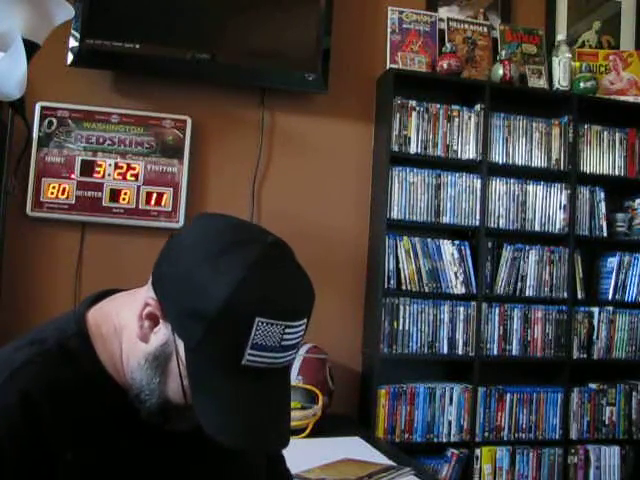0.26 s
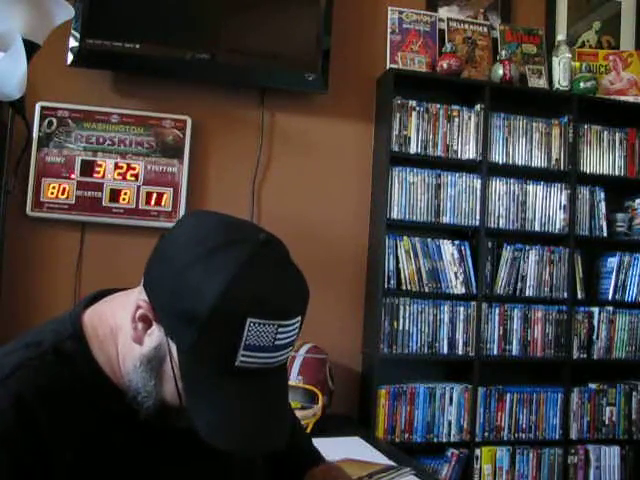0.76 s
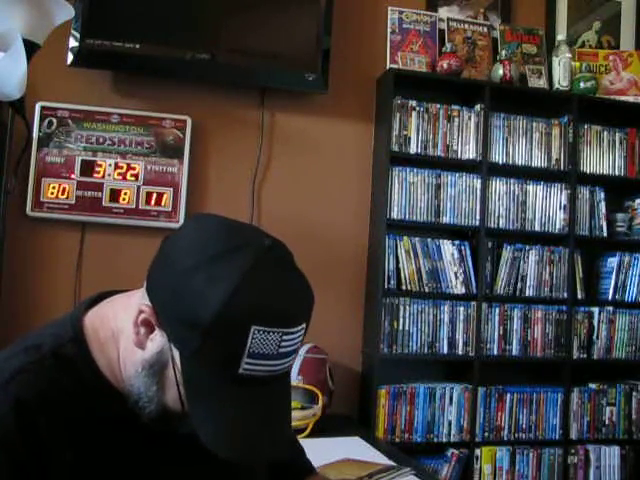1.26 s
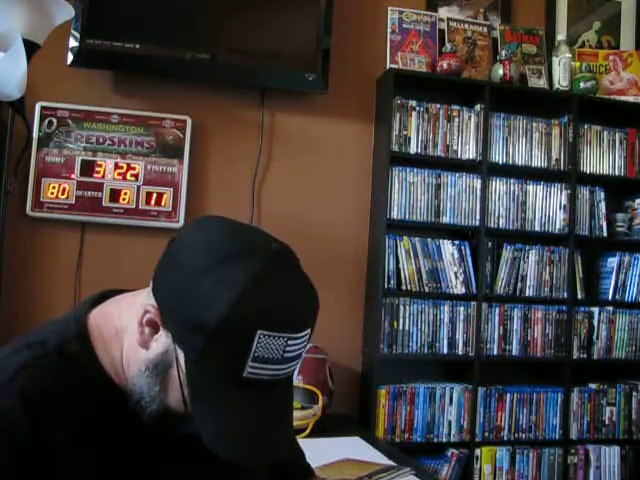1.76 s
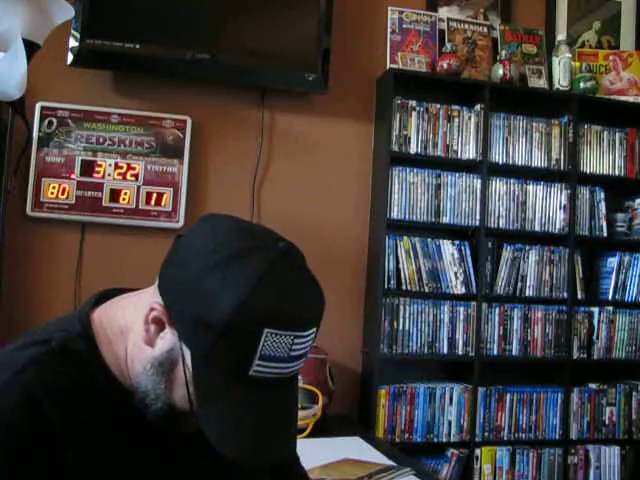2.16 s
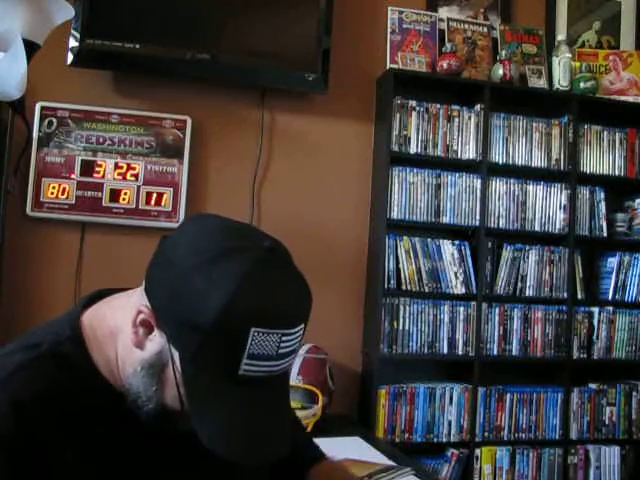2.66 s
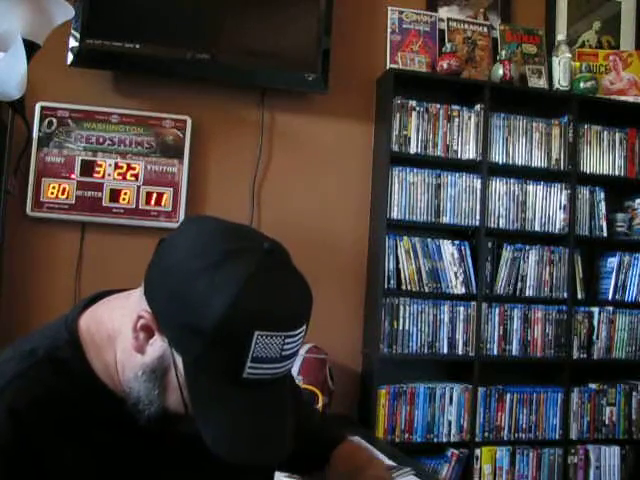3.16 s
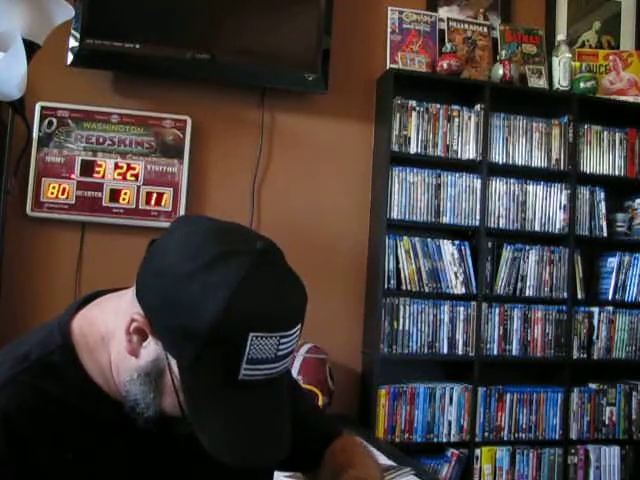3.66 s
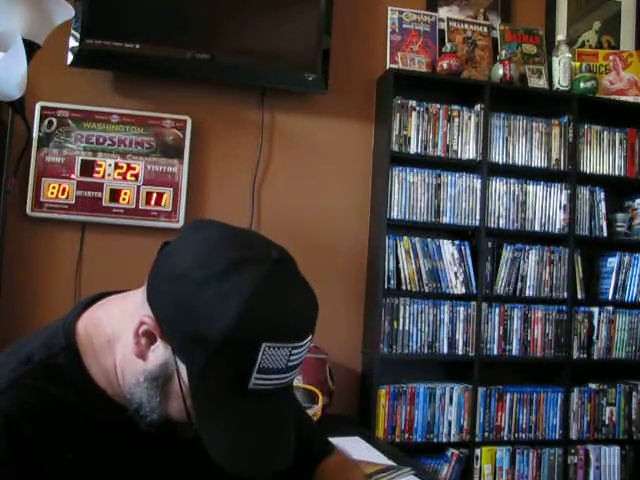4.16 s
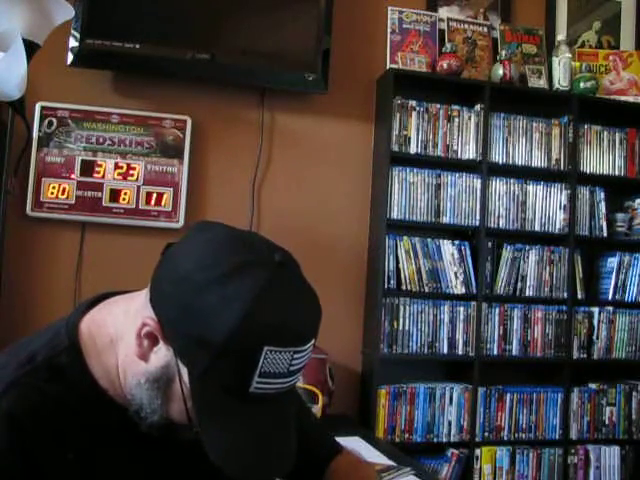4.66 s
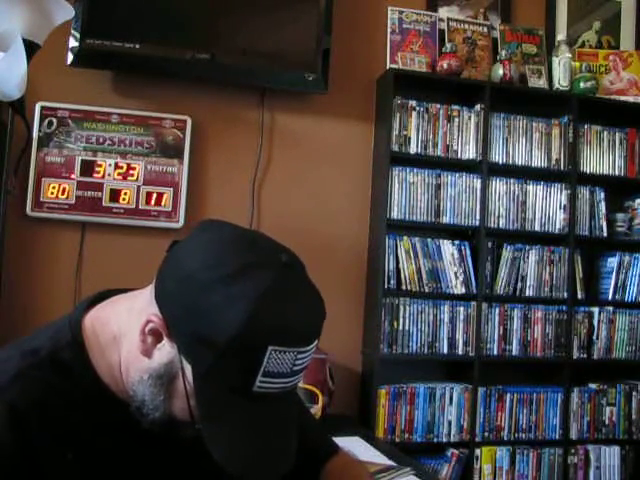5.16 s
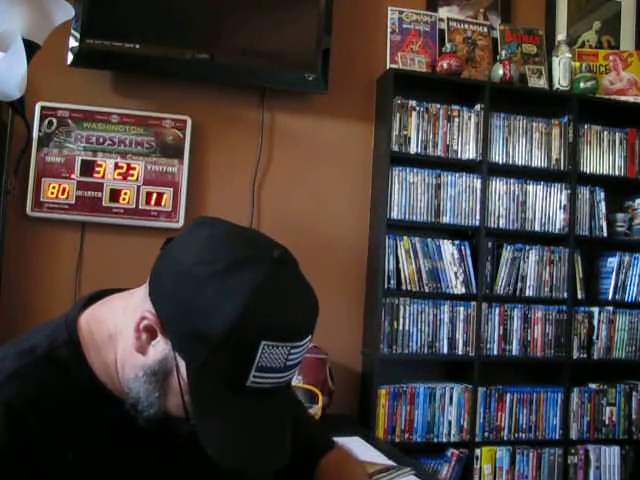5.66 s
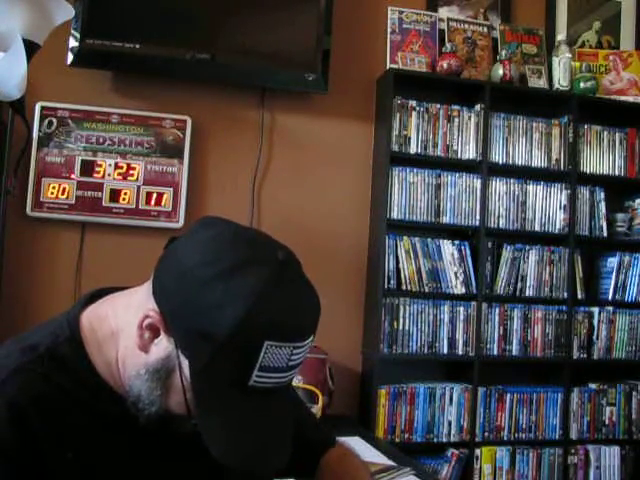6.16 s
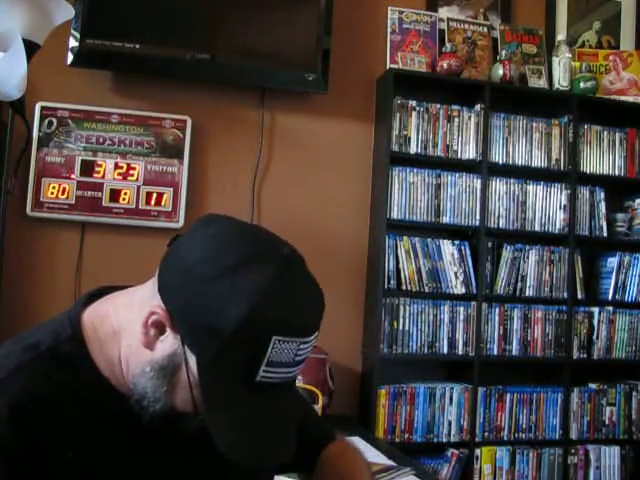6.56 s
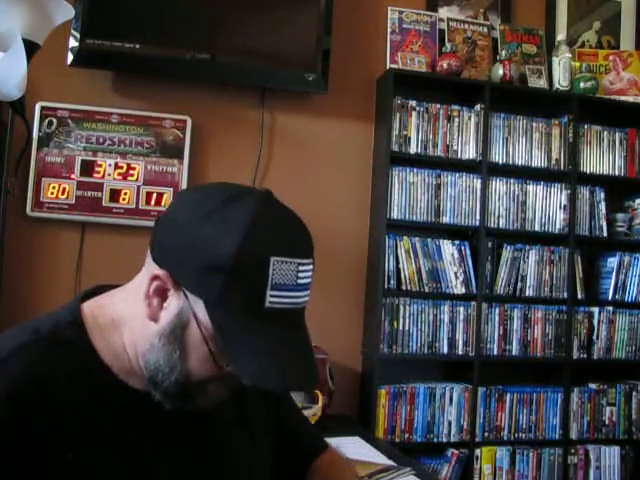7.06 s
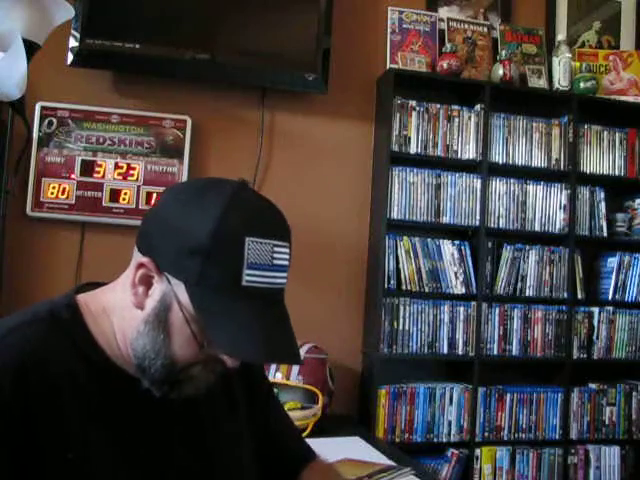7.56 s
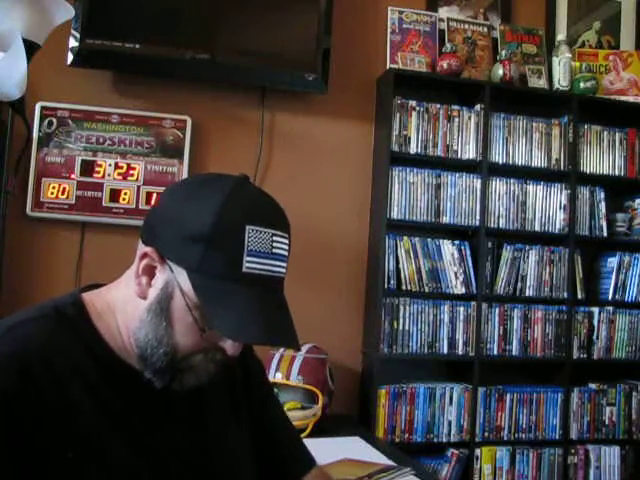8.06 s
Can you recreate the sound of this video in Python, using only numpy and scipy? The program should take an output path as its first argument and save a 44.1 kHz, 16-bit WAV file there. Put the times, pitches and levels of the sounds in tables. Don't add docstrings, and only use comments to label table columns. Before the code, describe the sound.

A close stereo pickup in a small furnished room, with faint air hiss and a low, slightly unsteady hum throughout. Two crisp tape snaps come at 0.05 and 0.1 s, then faint rustles and tiny picks. A small rip at 1.8 s precedes a hard, bright snap at 2.07 s. Quiet crinkling follows, with a dull knock near 2.8 s and light peels around 3.9 to 4.4 s. A finger rubs hollowly over cardboard at 4.7 to 4.9 s, running into a sharp rip at 5.0 s. Snaps and short rips follow at 5.6, 5.9 and 6.1 s; a strong snap at 6.4 s leads to dense, raspy tearing at 6.5, 6.9 and 7.25 s, lurching and briefly ringing. Loud snaps at 7.5, 7.66 and 7.95 s have dull box thuds, then small picks and crinkling finish by 8.3 s.

```python
import sys
import numpy as np
from scipy import signal
from scipy.fft import rfft, irfft
from scipy.io import wavfile
from scipy.ndimage import uniform_filter1d

SR = 44100
rng = np.random.default_rng(int(sys.argv[2]) if len(sys.argv) > 2 else 0)


def level_to_linear(level):
    exponent = np.asarray(level, float) / 20
    return 10 ** exponent


def transcribe(u):
    v = np.clip(np.atleast_2d(u).T, -1, 1)
    q = np.round(v * 32767).astype(np.int16)
    wavfile.write(sys.argv[1], SR, q)


N = 366030
FFT_SIZE = 2 ** 19
HZ = np.maximum(np.fft.rfftfreq(FFT_SIZE, 1 / SR), 1)


def rms_one(x):
    return x / np.sqrt(np.mean(x ** 2) + 1e-20)


def at_hz(points):
    hz, values = np.transpose(points)
    return np.interp(np.log(HZ), np.log(hz), values)


def through(x, response):
    return irfft(rfft(x, FFT_SIZE) * response)[..., :N]


def causal(points):
    half = FFT_SIZE // 2
    cepstrum = irfft(np.log(level_to_linear(at_hz(points))))
    cepstrum[1:half] *= 2
    cepstrum[half + 1:] = 0
    return np.exp(rfft(cepstrum))


def resonance(x, hz, width_hz):
    r = np.exp(-np.pi * width_hz / SR)
    poles = [1, -2 * r * np.cos(2 * np.pi * hz / SR), r * r]
    return signal.lfilter((1 - r * r) / 2 * np.array([1, 0, -1]), poles, x)


def stereo_pair(one, other):
    # frequency in Hz, left-right likeness from 0 to 1.
    likeness = [(60, .97), (300, .97), (1000, .78), (3000, .35), (5500, .3), (8000, .6), (14000, .05)]
    alike = at_hz(likeness)
    mid = np.sqrt(1 + alike) * rfft(one, FFT_SIZE)
    side = np.sqrt(1 - alike) * rfft(other, FFT_SIZE)
    return np.array([mid + side, mid - side]) / np.sqrt(2)


def background():
    # frequency in Hz, density in dB per Hz.
    air_tone = [(20, -7), (40, 3), (60, -2), (100, -5.5), (160, -8), (220, -12.5), (320, -12.5), (600, -19),
                (1000, -21.5), (2200, -22.5), (4500, -25), (8000, -30.5), (13000, -36), (16000, -40)]
    air_db, hum_db = -50.3, -52
    hum_hz, hum_width_hz = 120, 12
    air = irfft(stereo_pair(*rng.standard_normal((2, N))) * level_to_linear(at_hz(air_tone)))[:, :N]
    wobble = rms_one(resonance(rng.standard_normal(N), hum_hz, hum_width_hz))
    hum = np.sin(2 * np.pi * hum_hz * np.arange(N) / SR) + .4 * wobble
    return level_to_linear(air_db) * rms_one(air) + level_to_linear(hum_db) * rms_one(hum)


def room(x):
    # frequency in Hz, decay time t60 in seconds, wall level in dB.
    wall_table = [(300, 0.23, 1.5), (1000, 0.29, 1), (3100, 0.3, 1), (7700, 0.56, -11), (13640, 0.26, 1.5)]
    room_db, wall_ms = -1.5, 7.2
    hz, t60s, walls_db = np.transpose(wall_table)
    t, tails = np.arange(SR // 2) / SR, 0
    for low in 140 * 2. ** np.arange(7):
        white = rng.standard_normal((2, SR // 2))
        octave = signal.butter(2, [low, 2 * low], "band", fs=SR, output="sos")
        centre = np.log(low * np.sqrt(2))
        t60 = np.interp(centre, np.log(hz), t60s)
        wall_db = np.interp(centre, np.log(hz), walls_db)
        tails = tails + signal.sosfilt(octave, white) * level_to_linear(wall_db - 60 * t / t60)
    early = 1 + 0.35 * np.exp(-t / 0.015)
    tails = tails * early * np.clip(t * 1000 / wall_ms, 0, 1) ** 3
    return through(x, level_to_linear(room_db) * stereo_pair(*tails) / np.sqrt(np.sum(tails[0] ** 2)))


def ports(x):
    # frequency in Hz, left minus right in dB.
    lean_table = [(60, -14), (180, -6.5), (550, 3), (1650, -0.5), (4970, -6), (15000, 4)]
    # frequency in Hz, lead of the left port in radians.
    lead_table = [(500, 0.05), (2400, .3), (8000, .4), (11000, 1.2), (15000, 2.0)]
    half = level_to_linear(at_hz(lean_table) / 2) * np.exp(.5j * at_hz(lead_table))
    return through(x, np.array([half, 1 / half]))


def drift(rate):
    steps = rng.standard_normal(4002)
    return np.interp(np.arange(N) / SR * rate, np.arange(len(steps)), steps)


def clicks(per_s, spread_db, clump_db, clump_per_s):
    sizes = level_to_linear(spread_db * np.minimum(rng.exponential(1, N), 5)) * rng.choice([-1, 1], N)
    struck = rng.random(N) < per_s / SR
    return rms_one(sizes * struck * level_to_linear(clump_db * drift(clump_per_s)))


def drag():
    # time in seconds, level in dB.
    drag_levels = [
        (4.63, -66),
        (4.648, -59),
        (4.746, -37.5),
        (4.894, -42),
        (4.95, -58),
    ]
    hollow_hz, hollow_width_hz = 1430, 300
    s, db = np.transpose(drag_levels)
    grains = clicks(4000, spread_db=-1.5, clump_db=0, clump_per_s=60)
    once = resonance(grains, hollow_hz, hollow_width_hz)
    hollow = rms_one(resonance(once, hollow_hz, hollow_width_hz))
    return hollow * level_to_linear(np.interp(np.arange(N) / SR, s, db, left=-120, right=-120))


def colour(db, bright_db, thud_db, neutral):
    body_db = db + neutral[0] - 0.54 * bright_db
    sizzle_db = db + neutral[1] + 1.6 * bright_db
    return np.array([db, body_db, sizzle_db, db + thud_db])


def played(tables, edge_ms, neutral):
    gains, t = np.zeros((4, N)), np.arange(N) / SR
    for rows in tables:
        s, *controls = np.transpose(rows)
        on = slice(int(s[0] * SR), int(s[-1] * SR))
        gate = np.clip(np.minimum(t[on] - s[0], s[-1] - t[on]) * 1000 / edge_ms, 0, 1)
        moving = [np.interp(t[on], s, control) for control in controls]
        gains[:, on] += gate * level_to_linear(colour(*moving, neutral))
    return gains


def swell(s, ms):
    t = np.arange(-1024, 1024)
    bell = np.exp(-(t / SR * 500 / ms) ** 2)
    spectrum = rfft(rng.standard_normal(2048) * bell)
    even = irfft(spectrum / uniform_filter1d(abs(spectrum), size=11))
    return round(s * SR) + t, even / np.sqrt(np.mean(even ** 2) / np.mean(bell ** 2)), bell ** 3


def bumps():
    # centre in seconds, level in dB, half length in ms.
    bump_table = [
        (2.29, -60, 6.3),
        (3.918, -40, 8.8),
        (2.075, -40.5, 8.5),
        (6.39, -35.5, 9.2),
        (5.53, -44.5, 15.4),
        (6.82, -45.5, 14),
        (7.4, -45.5, 10),
    ]
    drive = np.zeros((4, N))
    for s, db, ms in bump_table:
        at, noise, bell = swell(s, ms)
        drive[1::2, at] += level_to_linear(np.c_[[db + 6, db]]) * noise * bell
    return drive


def pulls(rows, start_db, end_db, dulling_db, thud_db):
    tables = []
    for s, rise, fall, db, bright in rows:
        peak, end = s + rise, s + rise + fall
        tables.append([(s, db - start_db, bright, thud_db), (peak, db, bright, thud_db),
                       (end, db - end_db, bright - dulling_db, thud_db)])
    return tables


def pull_gains():
    # start in seconds, speeding up in seconds, slowing down in seconds,
    # peak in dB, brightness in dB.
    rustle_table = [(.33, 0.14, 0.029, -48.5, 0), (1.775, 0.01, 0.035, -43, 4),
                    (4.3, 0.029, 0.046, -48, -4), (.78, 0.043, 0.085, -47, -3),
                    (1.33, 0.024, 0.046, -50, -9), (1.42, 0.013, 0.039, -48.5, 0),
                    (1.93, .018, 0.07, -46.5, -9), (2.69, 0.041, 0.028, -41, 5.5),
                    (4.07, 0.028, 0.11, -36.5, 2.5), (4.64, 0.12, .08, -37, -3.5),
                    (4.76, .13, .06, -30, 1.5), (5.1, 0.028, 0.031, -32.5, -5.5),
                    (5.17, 0.049, .012, -45, -20), (5.33, 0.028, 0.041, -47.5, -10),
                    (5.41, 0.042, 0.074, -38.5, 1), (5.62, .012, .09, -50, 4),
                    (5.71, 0.04, .012, -34.5, -0.5), (6.73, 0.069, .04, -34, -1.5),
                    (7.02, 0.033, 0.091, -36.5, -3), (7.1, 0.061, .07, -39.5, -14.5)]
    rip_table = [(1.808, 0.014, 0.061, -33.5, 4), (3.9, 0.017, 0.029, -29, 3),
                 (4.385, 0.017, 0.018, -34, -23), (4.975, 0.01, 0.068, -19, 2.5),
                 (5.895, 0.033, 0.068, -21, 4), (6.1, 0.041, 0.074, -29.5, 2), (6.2, 0.047, 0.024, -37, 3),
                 (6.518, 0.015, 0.096, -19.5, 1), (6.85, 0.036, 0.18, -20.5, 2.5),
                 (7.24, 0.069, 0.068, -18, 3.5), (7.89, 0.012, 0.15, -30, 2.5),
                 (8.17, 0.018, 0.044, -38, -16)]
    slow = pulls(rustle_table, start_db=13.5, end_db=13.5, dulling_db=4, thud_db=-24)
    fast = pulls(rip_table, start_db=13.5, end_db=13.5, dulling_db=13, thud_db=-25)
    return played(fast + slow, edge_ms=13.3, neutral=(-5, -8.5))


def crinkle(pull):
    # time in seconds, grip in dB.
    grip_spells = [
        [(0.0, -62), (0.28, -56), (0.96, -69), (1.8, -60), (1.99, -48.5), (2.3, -58.5), (2.7, -58.5),
         (3.1, -49)],
        [(3.46, -67.5), (3.96, -65), (4.12, -51), (4.35, -50.5), (4.5, -64), (4.94, -52), (6.28, -45.5),
         (7.27, -39.5), (7.75, -52), (8.3, -39)],
    ]
    thud_db = -17.5
    spells = [[(s, db, 0, thud_db) for s, db in spell] for spell in grip_spells]
    creases = played(spells, edge_ms=3.3, neutral=(-9, -8.5))
    drive = creases * clicks(6000, spread_db=2.5, clump_db=1, clump_per_s=10)
    lone = clicks(150, spread_db=0.5, clump_db=-5, clump_per_s=5)
    drive[2] += (creases[2] + 1.05 * pull[2]) * lone
    return drive


def rips(pull):
    return pull * clicks(9000, spread_db=-1, clump_db=4, clump_per_s=110)


def patchy(x, patch_db, per_s):
    edges = 800 * 2 ** np.arange(0, 4.3, .5)
    out = x
    for low, high in zip(edges, edges[1:]):
        region = signal.butter(1, [low, high], "band", fs=SR, output="sos")
        out = out + signal.sosfilt(region, x) * (level_to_linear(patch_db * drift(per_s)) - 1)
    return out


def slips():
    # centre in seconds, level in dB, brightness in dB, half length in ms, ring of the taut film in Hz.
    slip_table = [(0.121, -37.5, -23, 8.7, 2330), (2.846, -47, -5, 5, 1800), (3.9392, -33, 5, 4.8, 3600),
                  (4.9846, -18.5, 5, 5.4, 3796), (5.0074, -17.5, 6, 7.1, 3900), (5.9235, -13, 4, 6.3, 4120),
                  (4.408, -28, -19.5, 5, 2560), (6.401, -16.5, -10, 3, 1860),
                  (6.5411, -15.5, 6, 10.6, 3780), (6.594, -14.5, 5, 4.1, 4930),
                  (6.876, -14.5, 5, 9.4, 5000), (6.902, -13.5, 8.5, 3.8, 5060),
                  (6.924, -17.5, -9, 2.5, 3840), (6.9451, -17, 11.5, 4.6, 4320),
                  (6.9633, -11.5, 6, 4.4, 3800), (6.9823, -24, 13.5, 6, 3830), (7.0117, -18, 4, 3.9, 4700),
                  (7.2836, -16.5, 5, 6, 5440), (7.3084, -12.5, 7, 4.4, 2760), (7.327, -15, 3, 7.3, 4800),
                  (7.4042, -21, 5, 6.5, 3630), (7.497, -21.5, -7.5, 6, 2140), (7.665, -23, -6, 6.3, 2510),
                  (7.9406, -17, 0, 4.7, 5000)]
    thud_db, ring_db, ring_width_hz = -30.5, 4, 420
    drive, hz = np.zeros((4, N)), np.arange(1025) * SR / 2048
    for s, db, bright, ms, ring_hz in slip_table:
        at, noise, bell = swell(s, ms)
        peak = level_to_linear(ring_db) / (1 + ((hz - ring_hz) / ring_width_hz) ** 2)
        ringing = irfft(rfft(noise) * (1 + peak))
        drive[:, at] += level_to_linear(np.c_[colour(db, bright, thud_db, (-10.5, -10))]) * ringing * bell
    return drive


def snaps():
    # time in seconds, peak in dB, brightness in dB, box thud in dB, length in ms.
    snap_table = [(0.0458, -14.5, 1.5, -32, 4.1), (0.1066, -11.5, -4, -18.5, 1.66),
                  (1.8148, -19.5, -1, -27, 4.9), (2.0073, -25, -24, -18, 1.4), (2.0681, -2.5, 4.5, -29, 3),
                  (2.8355, -23, -8, -9.5, 4.7), (3.676, -24.5, 7.5, -29, 2.7), (4.0747, -21, 5, -20, 2.2),
                  (4.4036, -18.5, -3, -8, 1.84), (4.7401, -27.5, 9, -36, 1.7), (5.1282, -19, 9.5, -31, 2),
                  (5.6201, -20.5, -26, -13, 2.8), (5.6436, -8, 3.5, -32, 3.6),
                  (6.3165, -15.5, 5.5, -24, 5.5), (6.3859, -1.5, 0, -19.5, 3.64),
                  (6.482, -12.5, 2, -12, 3.1), (6.6588, -6.5, -7.5, -24.5, 8.7),
                  (7.2598, -8.5, -4, -20, 2.9), (7.4875, -4, -4, -23, 2.2), (7.5828, -17, -20.5, -13.5, 12),
                  (7.6585, -1.5, -1.5, -24, 2), (7.9518, -5, 6.5, -20.5, 3.6), (8.1868, -18, -3, -21, 2.7),
                  (8.2048, -11, -15, -20, 2.1)]
    # time in seconds, peak in dB, brightness in dB, box thud in dB.
    tick_table = [(0.47, -55, 16, -22), (0.833, -30, 8, -20), (1.11, -51, -25, 3), (1.4319, -34, 3, -12),
                  (1.7843, -31.5, 6, -16), (1.941, -37, -3, -6), (2.28, -41, 3, -3),
                  (8.2183, -27, -14, -19), (2.7163, -25.5, 1, -48), (2.9853, -52, 16, -13),
                  (3.0494, -40, 3, -5), (3.485, -43, 9, -30), (3.66, -45.5, 14, -10),
                  (3.7942, -48.5, -35, 5.5), (4.668, -37, -5, -33), (4.7808, -24, 7, -34),
                  (4.8194, -20, 5, -34), (4.8804, -25, -2, -35), (4.0986, -29.5, 5, -24),
                  (5.1855, -35, 12, -29), (5.2106, -23, 5.5, -20.5), (5.3512, -25.5, 2, -33),
                  (5.7159, -17.5, 7.5, -39), (5.8555, -26, -1, -66), (6.3243, -27, 7, -22),
                  (6.38, -22, -4, -15), (7.7194, -35, -4, -31), (7.9011, -21, 5, -30),
                  (7.9278, -18.5, 13.5, -18), (8.1605, -26, -9, -6.5)]
    tick_ms, trim_db, rise, spike = 3.7, -3, 0.29, 0.49
    drive, t_ms = np.zeros((4, N + 1024)), np.arange(1024) / SR * 1000
    for s, db, bright, thud, ms in [*snap_table, *[(*tick, tick_ms) for tick in tick_table]]:
        draw = rng.standard_normal(1024)
        draw = draw * abs(draw) ** spike
        x = t_ms / ms
        shape = np.minimum(x / rise, 1) * np.exp(-x ** 2)
        spectrum = rfft(draw * shape)
        even = irfft(spectrum / uniform_filter1d(abs(spectrum), size=7)) * np.sqrt(shape)
        at = round(s * SR)
        levels = level_to_linear(np.c_[colour(db + trim_db, bright, thud, (-8, -13.5))])
        drive[:, at:at + 1024] += levels * rms_one(even) * np.std(shape)
    return drive[:, :N]


def parcel(drive):
    # frequency in Hz, density in dB per Hz.
    film_tone = [(530, -36), (900, -12), (1080, -7.5), (1260, -6.5), (1600, -4.5), (2020, -3.5),
                 (3190, 1.5), (3910, 2.5), (10400, -16), (14000, -24), (16000, -27)]
    # frequency in Hz, width in Hz, level in dB.
    panel_modes = [(308, 92, 4.5), (463, 94, 6.5), (843, 380, 2)]
    body_top_hz, sizzle_from_hz = 2200, 6700
    film, out = causal(film_tone), 0
    ranges = ([body_top_hz, sizzle_from_hz], "band"), (body_top_hz, "low"), (sizzle_from_hz, "high")
    for clicks_in, (hz, kind) in zip(drive, ranges):
        split = signal.butter(3, hz, kind, fs=SR, output="sos")
        part = film * signal.sosfreqz(split, worN=HZ, fs=SR)[1]
        out = out + through(clicks_in, part / np.sqrt(np.mean(abs(part) ** 2)))
    thud = 0
    for k, (hz, width_hz, db) in enumerate(panel_modes):
        thud = thud + level_to_linear(db) * resonance(drive[3], hz, width_hz) * (-1) ** k
    return out + level_to_linear(21) * thud


def scene():
    pull = pull_gains()
    sheet = patchy(rips(pull) + crinkle(pull), patch_db=3, per_s=22)
    peeling = parcel(sheet + snaps())
    cracking = parcel(slips() + bumps())
    direct = ports(peeling + cracking + drag())
    return direct + room(peeling) + room(cracking) + background()


def roll_off(x):
    return signal.sosfilt(signal.butter(12, 16820, fs=SR, output="sos"), x)


def record(dry):
    knee_db, squeeze, recovery_db_per_s, mic_top_hz = -28, .2, 5, 16150
    level_db = 10 * np.log10(uniform_filter1d(np.mean(dry ** 2, axis=0), 441) + 1e-9)
    fall_db = recovery_db_per_s * np.arange(N) / SR
    held_db = np.maximum.accumulate(level_db + fall_db) - fall_db
    duck_db = -squeeze * np.maximum(held_db - knee_db, 0)
    smooth_db = signal.lfilter([.002], [1, -.998], duck_db)
    rounded = .92 * np.tanh(dry * level_to_linear(smooth_db) / .92)
    top_cut = signal.cheby2(14, 50, mic_top_hz, fs=SR, output="sos")
    return roll_off(signal.sosfilt(top_cut, rounded))


dry = scene()
out = record(dry)
transcribe(out)
```